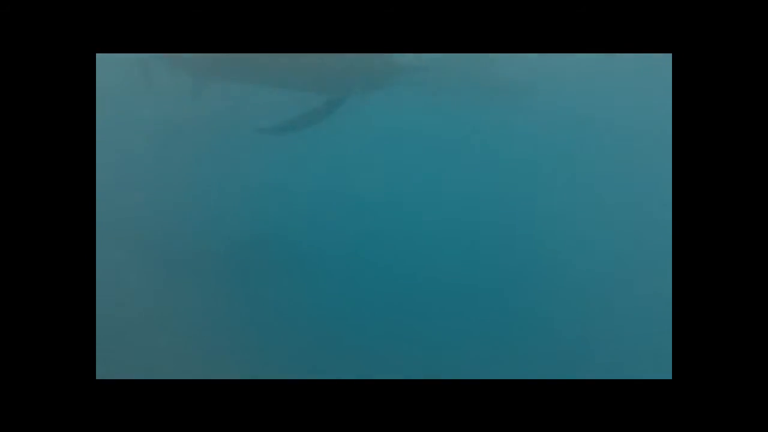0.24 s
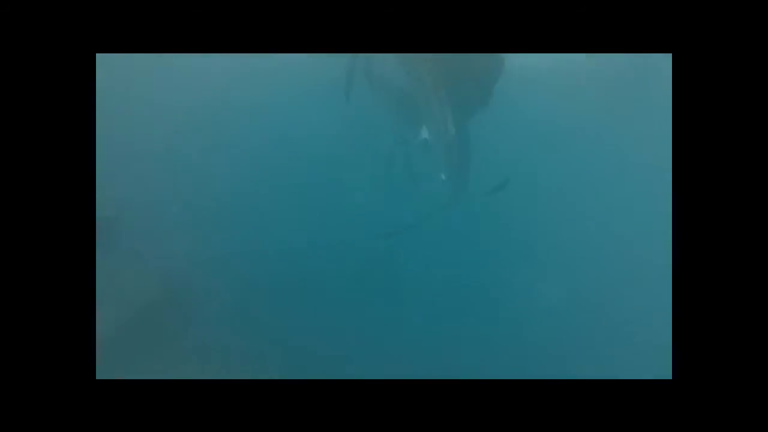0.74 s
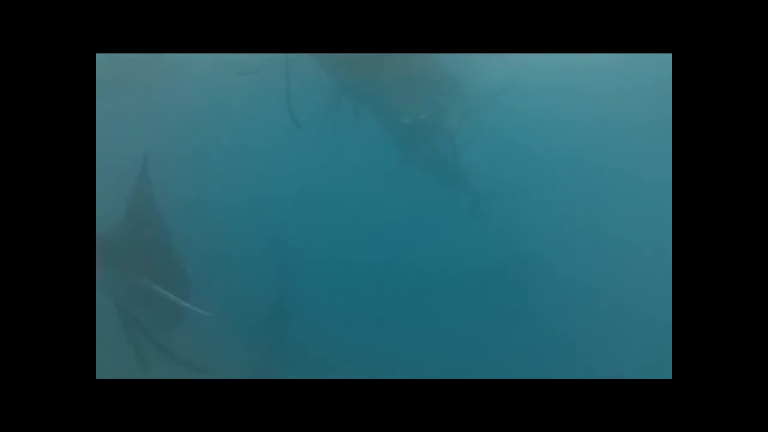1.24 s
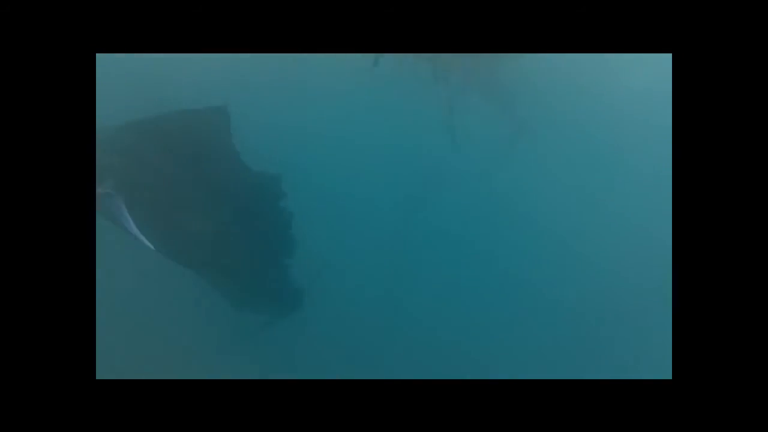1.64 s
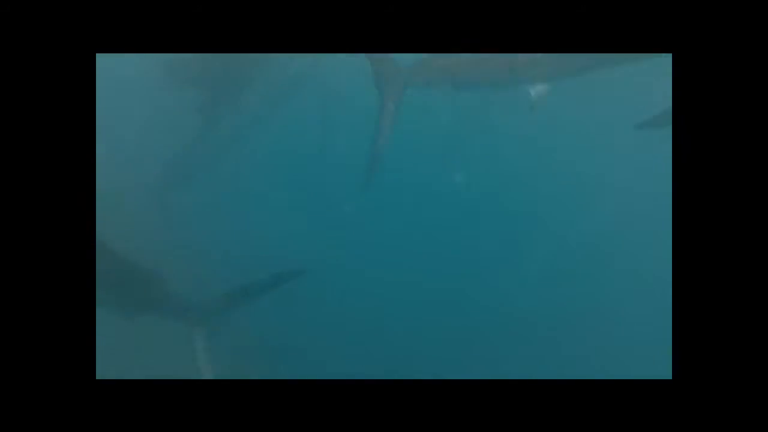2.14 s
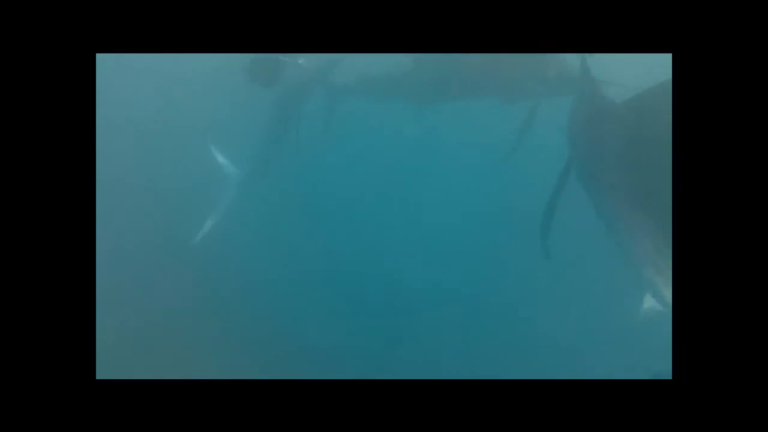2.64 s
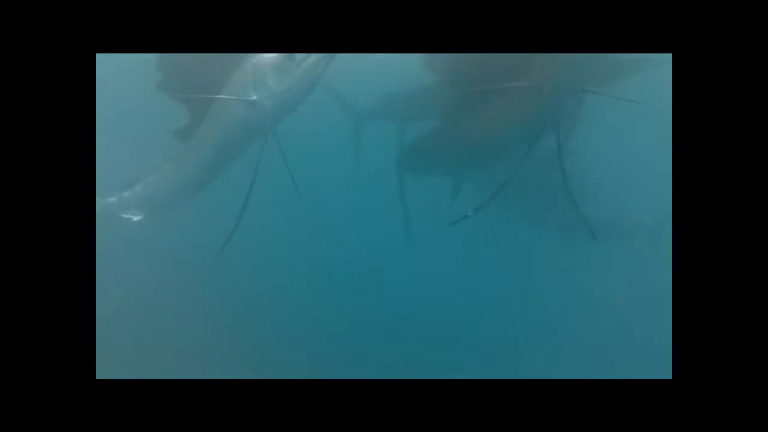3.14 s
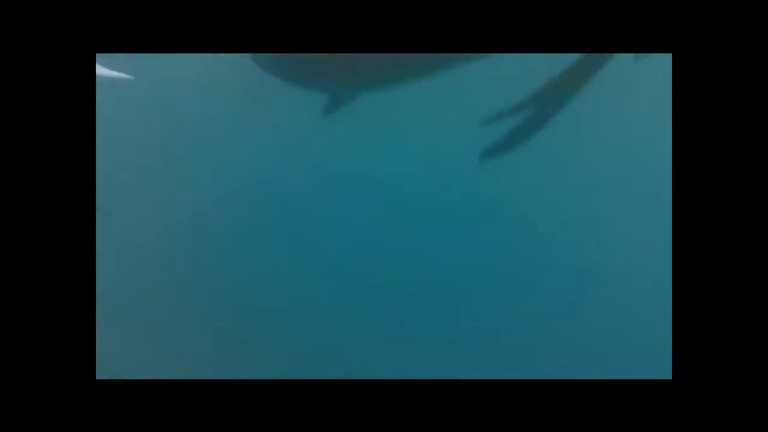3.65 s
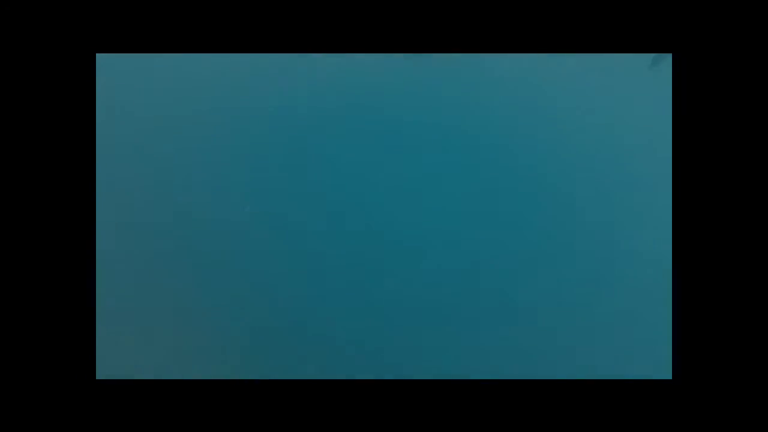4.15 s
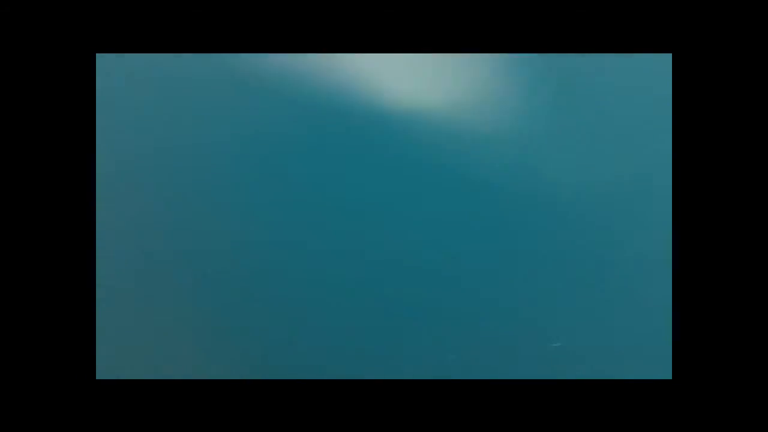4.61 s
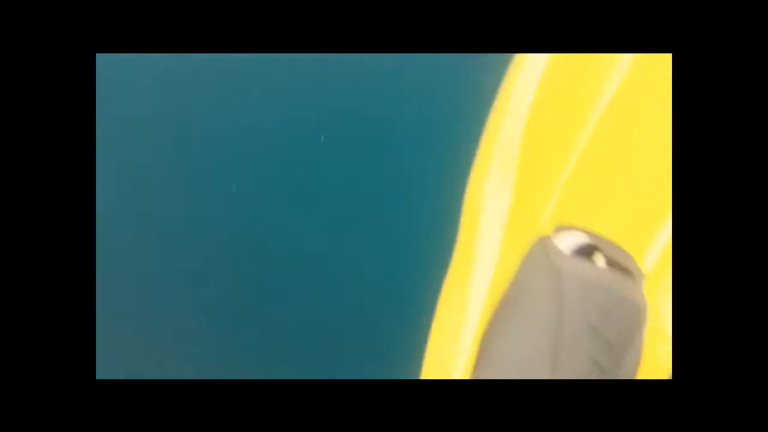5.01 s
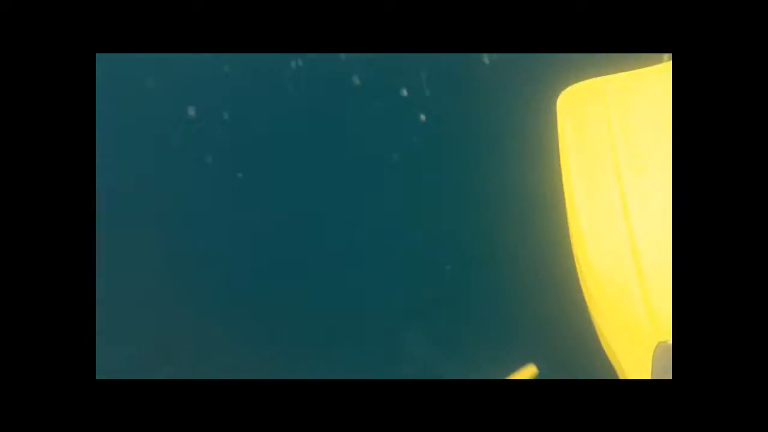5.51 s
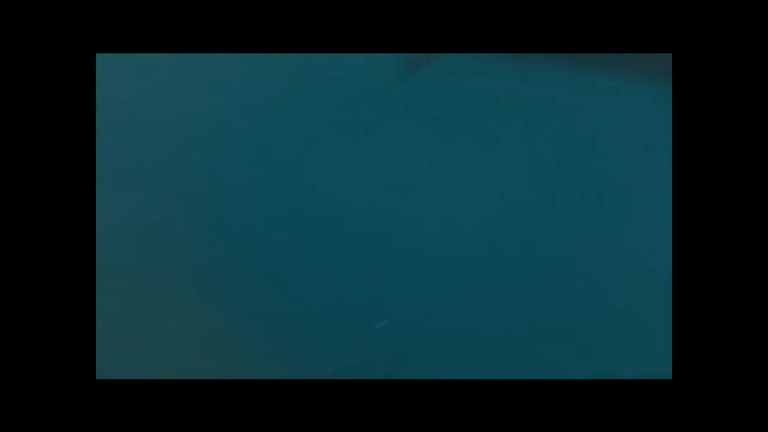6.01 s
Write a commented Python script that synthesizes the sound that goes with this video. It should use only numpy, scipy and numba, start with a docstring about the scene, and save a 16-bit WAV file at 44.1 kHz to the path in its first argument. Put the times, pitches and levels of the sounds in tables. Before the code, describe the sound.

Just below the sea surface, a sealed camera is swum among large fish. Deep wavering slosh and soft pressure thumps run throughout, with small bubbles ringing hollowly in the case. Thuds and glugs grow around 3.7 seconds, a rough cluster of hard knocks and gurgles hits at about 4.4 to 5, then it calms before another surge near 6. Very close, muffled sound with faint treble buzz.

```python
"""Just under the sea surface, a small camera in a sealed housing is swum along.
Water sloshes (a wandering slow swing), buffets (low noise), gurgles (bubble swarms) and surges
(pressure bumps) against the case; the air inside rings near 430 Hz (band-passed bubble knocks).
The loud pressure swings keep the stepped gain control of the recorder busy, so that its steps
buzz and tick faintly in the treble."""
import sys
import numpy as np
from scipy import signal
from scipy.io import wavfile
from scipy.ndimage import uniform_filter1d
from numba import njit

SR = 44100
rng = np.random.default_rng(int(sys.argv[2]) if len(sys.argv) > 2 else 0)


def persist_wave(psi):
    """Save psi, clipped to +-1, as 16-bit WAV."""
    counts = np.round(np.clip(psi, -1, 1) * 32767).astype(np.int16)
    wavfile.write(sys.argv[1], SR, np.atleast_2d(counts).T)


N = 276504
T = np.arange(N) / SR
# Levels in the scene's tables apply before the overall water level and the recorder's gain;
# only slosh, buffeting, gurgle, surges and glug notes then pass the case wall.


def undb(db):
    """Amplitude factor of a level in dB."""
    return 10 ** (np.asarray(db) / 20)


def unit(x):
    """Scale to an RMS of 1."""
    return x / np.sqrt(np.mean(x ** 2))


def band(x, lo_hz, hi_hz, order=2):
    """Keep the band between two frequencies."""
    return signal.sosfilt(signal.butter(order, [lo_hz, hi_hz], "band", fs=SR, output="sos"), x)


def noise():
    """White noise with a spread of 1."""
    return rng.standard_normal(N)


def walk(rate):
    """Random levels held 1 / rate s and slewed twice; spread 1."""
    hold = int(SR / rate)
    levels = np.repeat(rng.standard_normal(N // hold + 1), hold)
    slewed = uniform_filter1d(uniform_filter1d(levels, hold), hold)
    return unit(slewed[:N])


@njit
def rings(start, hz, t60, glide, attack, size, count):
    """Swelling, then decaying sines whose pitch slides by the factor glide over their life."""
    out = np.zeros(count)
    for k in range(len(start)):
        life, phase = int(t60[k] * SR), 0.
        for i in range(min(life, count - start[k])):
            phase += 2 * np.pi * hz[k] * glide[k] ** (i / life) / SR
            swell = min(i / (attack[k] * SR), 1.)
            out[start[k] + i] += size[k] * swell * np.sin(phase) * 1000. ** (-i / life)
    return out


def single_rings(s, db, hz, t60, glide, attack):
    """Single rings at given moments; t60, glide and attack may be shared by all."""
    one = np.ones(len(s))
    start = (s * SR).astype(np.int64)
    return rings(start, hz, t60 * one, glide * one, attack * one, undb(db), N)


def bubbles(rate, lo_hz, hi_hz, cycles, spread_db):
    """A random swarm of bubble notes rising in pitch, a few much louder than the rest."""
    when, pitch, loud = rng.random((int(rate * N / SR), 3)).T
    start = (when * N).astype(np.int64)
    hz = lo_hz * (hi_hz / lo_hz) ** pitch
    size = undb(-spread_db * np.log(1 - loud))
    glide = np.full(len(hz), 1.25)
    return unit(rings(start, hz, cycles / hz, glide, .5 / hz, size, N))


def bursts(table, attack_s, release_s):
    """Power of each level column over time: every row swells, holds and dies away."""
    power = 0
    for start, length, *db in table:
        before = (start - T) / attack_s
        after = (T - start - length) / release_s
        below_db = 20 * np.maximum(np.maximum(before, after), 0)
        power = power + undb(2 * (np.array(db)[:, None] - below_db))
    return power


def with_calm(power, calm_db):
    """Amplitude of bursts over the steady level that remains between them."""
    return np.sqrt(power + undb(2 * calm_db))


ROCK_HZ, ROCK_WANDER = 14, .3  # middle rate of the rocking, and its wander on a log scale


def rocking():
    """A slow swing whose rate and size wander."""
    turns = np.cumsum(ROCK_HZ * np.exp(ROCK_WANDER * walk(14))) / SR
    return unit(undb(2.5 * walk(10)) * np.sin(2 * np.pi * turns))


# rocking of the case in the swell, before it is lowered around surges: (t/s, level/dB)
SLOSH_LEVEL = [(0, -31.5), (.6, -32), (.85, -36), (1.15, -32.5), (1.4, -30), (2.1, -30.5), (3.0, -31.5),
               (3.55, -30.5), (3.72, -29), (3.9, -29.5), (4.1, -27), (4.35, -30), (4.6, -20.5),
               (4.9, -23.5), (5.1, -30), (5.65, -26.5), (5.85, -26), (6.1, -25.5), (6.2, -35), (6.27, -48)]
RUMBLE_DB = -9  # eddies that go with the rocking, below its level
SURGE_DUCK = .7  # share by which the random rocking is lowered around each surge


def slosh(surge_nearness):
    """The case rocks in the swell among low eddies, both lowered around each surge."""
    rumble = undb(RUMBLE_DB) * unit(band(noise(), 13, 48))
    level = undb(np.interp(T, *np.transpose(SLOSH_LEVEL)))
    return (1 - SURGE_DUCK * surge_nearness) * level * (rocking() + rumble)


# resonances of the trapped air: (f/Hz, width/Hz, relative level/dB)
AIR_RESONANCES = [(386.8, 90, -2.5), (454.3, 57, 2.5), (726, 400, -30), (957, 250, -24.5),
                  (1500, 1100, -39)]


def cavity():
    """Small bubbles and fizz on the walls ring the trapped air; nothing much passes above it."""
    knocks = bubbles(260, 300, 900, 2.6, 2.1) + noise()
    air = 0
    for hz, width, db in AIR_RESONANCES:
        air = air + undb(db) * band(knocks, hz - width / 2, hz + width / 2, order=3)
    return undb(1.6 * walk(25)) * unit(air)


# short ringing accents, a few of them clear pops: (t/s, level/dB, starting f/Hz)
RING_ACCENTS = [(0.049, -28, 460), (0.113, -47, 450), (0.321, -32, 447), (0.412, -47, 453),
                (0.455, -41, 464), (0.627, -42, 355), (0.707, -40, 376), (0.799, -23.5, 392),
                (0.819, -23, 445), (1.007, -39, 350), (1.041, -32, 446), (1.283, -36, 439),
                (1.73, -37, 426), (1.825, -28, 434), (1.876, -20, 414), (1.944, -40.5, 427),
                (2.045, -33, 454), (2.288, -40, 450), (2.405, -41.5, 474), (2.462, -36, 436),
                (2.486, -27, 458), (2.88, -40, 345), (3.071, -43, 380), (5.651, -40, 450),
                (6.061, -37, 405)]


def ring_accents():
    """Very short decaying sines that fall in pitch."""
    return single_rings(*np.transpose(RING_ACCENTS), t60=.012, glide=.72, attack=.00083)


# short bright chirps and ticks; the one at 6.043 s is a gain-step tick: (t/s, level/dB, starting f/Hz)
BRIGHT_CHIRPS = [(4.791, -49.5, 1720), (4.559, -40, 750), (4.797, -38, 778), (4.799, -43.5, 1290),
                 (4.8, -55, 3630), (4.8025, -45, 2110), (4.807, -42.5, 1650), (4.812, -46, 1580),
                 (4.817, -54.5, 3230), (4.825, -54, 2460), (4.816, -35.5, 1540), (4.825, -42.5, 1860),
                 (4.832, -51, 1324), (4.84, -48.5, 1325), (4.8484, -52.5, 1284), (4.862, -48, 1500),
                 (4.875, -53, 1900), (6.043, -50, 1900)]


def chirps():
    """Brief decaying sines that rise a little in pitch."""
    return single_rings(*np.transpose(BRIGHT_CHIRPS), t60=.015, glide=1.1, attack=.00058)


def buffeting():
    """Turbulent water on the case: low noise of flickering size."""
    return undb(3.5 * walk(18)) * unit(band(noise(), 25, 125))


# turbulent water buffeting the case: (t/s, length/s, buffeting level/dB, gurgle level/dB)
BUFFET_BURSTS = [(.1, 0.14, -41, -35.5), (1.04, 0.043, -32, -56), (1.34, 0.15, -32, -48.5),
                 (1.7, 0.31, -43, -62), (2.45, 0.058, -39.5, -54.5), (2.58, 0.056, -29, -54),
                 (2.85, 0.043, -64, -53), (3.46, 0.17, -36.5, -69), (3.73, 0.064, -30, -54.5),
                 (3.84, 0.1, -39.5, -35.5), (4.43, 0.084, -24, -31), (4.53, 0.061, -29, -29),
                 (4.64, 0.029, -23.5, -24), (4.79, 0.12, -26, -48.5), (4.98, 0.043, -28, -41),
                 (5.4, 0.058, -40.5, -62), (5.81, 0.19, -31.5, -40), (5.92, 0.27, -26, -33.5)]


def buffet_powers():
    """Powers of the buffeting and of the gurgle that goes with it; attack and release span 20 dB."""
    return bursts(BUFFET_BURSTS, attack_s=.037, release_s=.071)


# streams of small bubbles over the case: (t/s, length/s, cavity ring level/dB, gurgle level/dB)
BUBBLE_STREAMS = [(0.0, 0.35, -32, -35.5), (.41, 0.25, -32.5, -37.5), (.68, 0.3, -30, -32),
                  (1.02, 0.093, -27, -29.5), (1.16, 0.12, -34, -35), (1.27, 0.15, -39, -47),
                  (1.46, 0.016, -43.5, -51), (1.57, 0.052, -45, -51), (1.66, 0.036, -36.5, -40),
                  (1.73, 0.18, -26, -34), (1.88, 0.23, -28.5, -38), (2.17, 0.072, -36, -45.5),
                  (2.29, 0.059, -39.5, -46), (2.38, 0.024, -33, -43.5), (2.42, 0.099, -28, -37),
                  (2.73, 0.058, -34.5, -43.5), (2.84, 0.12, -43.5, -48.5), (3.05, 0.13, -37, -51),
                  (3.3, 0.072, -46, -70), (3.77, 0.013, -43, -48), (3.86, 0.093, -51.5, -40),
                  (4.04, 0.11, -42.5, -54), (4.2, 0.049, -47.5, -63), (4.45, 0.045, -40, -23.5),
                  (4.655, 0.0077, -39, -26.5), (4.74, 0.0099, -34, -32), (4.862, .02, -35.5, -20.5),
                  (5.14, 0.073, -55, -64), (5.3, 0.038, -48, -52), (5.43, 0.036, -45, -67),
                  (5.6, 0.072, -45.5, -46.5), (5.84, 0.054, -56, -35.5), (5.91, 0.06, -36.5, -20.5),
                  (6.02, 0.094, -39.5, -27), (6.17, 0.081, -50, -41.5)]


def stream_powers():
    """Powers of the cavity ring and gurgle of the streams; attack and release span 20 dB."""
    return bursts(BUBBLE_STREAMS, attack_s=.038, release_s=.041)


def gurgle():
    """A swarm of bubble notes mixed with noise, flickering in size."""
    water = bubbles(120, 140, 380, 3.8, 2.5) + .79 * noise()
    return undb(2.2 * walk(12)) * unit(band(water, 125, 370))


# big bubbles breaking beside the case: (t/s, level/dB, starting f/Hz, t60/s, glide factor, attack/s)
BIG_BUBBLES = [(1.675, -26, 413, 0.059, 0.86, 0.0033), (3.126, -28, 432, 0.17, 1.03, 0.0059),
               (3.685, -18, 477, 0.12, 0.45, 0.015), (3.705, -24.5, 373.6, 0.37, 1.44, .016),
               (3.81, -29.5, 409, 0.18, 1.12, .012), (3.903, -22.5, 298, 0.086, 0.56, 0.0063),
               (4.401, -11.5, 319.5, 0.035, 0.64, 0.0022), (4.471, -9, 246, 0.088, 1.02, 0.0032),
               (4.736, -11.5, 451, 0.057, 1.2, 0.0053), (4.863, -9, 252.3, 0.097, 1, 0.0035),
               (5.002, -17.5, 249, 0.037, 1.4, 0.0026), (6.04, -17.5, 269, 0.045, 0.49, 0.0037),
               (6.127, -30, 255, 0.065, 0.35, 0.0017)]
GLUG_OVERTONE_DB = -27.5  # octave above, below the level of its note


def glugs():
    """Big bubbles, and apart from them the faint octave of each, which dies first."""
    s, db, hz, t60, glide, attack = np.transpose(BIG_BUBBLES)
    notes = single_rings(s, db, hz, t60, glide, attack)
    octaves = single_rings(s, db + GLUG_OVERTONE_DB, 2 * hz, .5 * t60, glide ** .5, attack)
    return notes, octaves


# pressure surges on the case: (t/s of the peak, push 1 or pull -1, level/dB, half fall/ms)
PRESSURE_SURGES = [(0.023, -1, -20, 7.6), (0.118, 1, -24, 23), (0.168, -1, -21.5, 2.6),
                   (0.211, 1, -18.5, 9.9), (0.26, -1, -20, 12.4), (0.294, 1, -22, 12),
                   (0.33, -1, -22.5, 18.3), (0.368, 1, -17.5, 20), (0.429, -1, -26.5, 9.8),
                   (0.463, 1, -26.5, 9.8), (0.5, -1, -21.5, 23), (0.554, 1, -22.5, 11),
                   (0.585, -1, -21.5, 19), (0.624, 1, -24, 21), (0.715, 1, -23.5, 11),
                   (0.859, 1, -20, 20.6), (.66, -1, -22, 15), (0.979, -1, -16.5, 7.3), (1.115, -1, -23, 19),
                   (1.154, 1, -23, 20), (1.206, -1, -23.5, 11.5), (1.24, 1, -21, 25), (1.276, -1, -21, 8),
                   (1.294, 1, -16.5, 8.2), (1.309, -1, -21, 5), (1.326, 1, -23.5, 5.5),
                   (1.368, 1, -13, 3.3), (1.388, 1, -18.5, 3.7), (1.432, -1, -15.5, 7.5),
                   (1.464, -1, -21, 8), (1.492, 1, -19.5, 6.8), (1.526, -1, -11, 3.2),
                   (1.577, 1, -21.5, 21.3), (1.612, -1, -17, 21.5), (1.656, 1, -24, 12), (1.75, 1, -23, 10),
                   (1.778, -1, -14.5, 10.4), (1.81, 1, -25, 14), (1.941, -1, -26, 14), (1.982, 1, -23, 18),
                   (2.063, -1, -24.5, 7.6), (2.098, 1, -15, 20.5), (2.157, -1, -19, 18.7),
                   (2.2, 1, -23, 10.4), (2.232, -1, -18, 20.5), (2.291, 1, -19.5, 20),
                   (2.346, -1, -21.5, 26), (2.534, 1, -15.5, 14), (2.585, -1, -20.5, 5.8),
                   (2.604, -1, -14, 2.7), (2.635, -1, -19.5, 9.9), (2.676, 1, -17.5, 6.3),
                   (2.716, 1, -20, 11.3), (2.77, 1, -17, 36.7), (2.828, -1, -15, 16.8),
                   (2.883, -1, -17, 10.4), (2.941, 1, -17, 42), (3.013, -1, -18.5, 16.4),
                   (3.043, 1, -20, 16), (3.079, -1, -20.5, 16.4), (3.156, 1, -20, 10.5),
                   (3.186, -1, -17.5, 16.6), (3.237, 1, -16.5, 7.7), (3.228, 1, -20.5, 7.2),
                   (3.262, -1, -15, 23), (3.315, 1, -18.5, 14), (3.391, 1, -21, 12), (3.433, -1, -16, 6.9),
                   (3.496, 1, -20, 10.6), (3.526, -1, -13, 2.25), (3.627, 1, -16, 25),
                   (3.669, -1, -15.5, 24.5), (3.757, 1, -9.5, 2.9), (3.767, 1, -12.5, 8.7),
                   (3.788, -1, -7, 13), (3.821, 1, -24.5, 20), (3.894, 1, -6.5, 1.8),
                   (3.942, -1, -8.5, 4.6), (3.984, 1, -20, 18), (4.039, 1, -20, 13.4),
                   (4.145, -1, -17, 25.5), (4.201, 1, -20, 19.3), (4.251, -1, -16.5, 19),
                   (4.302, 1, -30, 6.1), (4.334, -1, -19.5, 16.5), (4.386, 1, -18, 4.9),
                   (4.44, 1, -14.5, 0.98), (4.463, 1, -9, 1.14), (4.471, 1, -2.5, 0.62),
                   (4.475, -1, -9.5, 0.92), (4.493, -1, -11, 1.4), (4.506, 1, -6.5, 1.76),
                   (4.526, 1, -7, 2.5), (4.536, 1, -11.5, 1.3), (4.548, -1, -9, 5.8), (4.558, 1, -5.5, 4.2),
                   (4.573, -1, -11, 3.7), (4.581, 1, -12.5, 2.8), (4.591, -1, -11.5, 18.4),
                   (4.64, 1, -11, 8.3), (4.655, -1, -2.5, 2.16), (4.664, 1, -9, 0.96), (4.673, 1, -10, 2.6),
                   (4.69, -1, -8, 4.5), (4.727, 1, -12.5, 4.9), (4.734, -1, -5, 1.38),
                   (4.763, -1, -11, 3.5), (4.808, 1, -16, 4.6), (4.83, -1, -14.5, 2.5),
                   (4.848, -1, -12.5, 4), (4.86, 1, -8, 4), (4.876, -1, -4, 1.14), (4.916, 1, -19, 7.4),
                   (4.947, 1, -17, 14), (5, -1, -11.5, 4.8), (5.026, 1, -18, 6.8), (5.084, 1, -14.5, 12.8),
                   (5.129, -1, -19.5, 10.5), (5.153, 1, -15.5, 18), (5.198, -1, -15.5, 21),
                   (5.313, 1, -18.5, 25.2), (5.365, -1, -17, 17), (5.395, -1, -20.5, 6),
                   (5.439, 1, -17, 32.6), (5.517, -1, -21, 23), (5.576, 1, -20, 10.8),
                   (5.614, -1, -19, 9.4), (5.659, 1, -17, 43.5), (5.708, -1, -21.5, 9),
                   (5.725, 1, -18, 3.3), (5.737, -1, -16.5, 5.5), (5.752, 1, -16.5, 8.2),
                   (5.77, -1, -12.5, 21), (5.826, 1, -14, 10.4), (5.869, -1, -13.5, 5.2),
                   (5.888, 1, -8.5, 15.6), (5.921, -1, -9.5, 2.2), (5.931, -1, -12, 8.7),
                   (5.962, 1, -18.5, 8), (5.993, -1, -18.5, 8), (6.043, 1, -8.5, 0.7),
                   (6.064, 1, -11.5, 1.28), (6.086, -1, -14.5, 1.7), (6.135, 1, -13, 2),
                   (6.204, -1, -17, 12.3), (6.242, 1, -17, 1.5)]
RISE_MS, RISE_POWER = 1.5, .52  # half rise = RISE_MS * (half fall in ms) ** RISE_POWER


def surges():
    """Smooth bumps of pressure (slow ones rise faster than they fall), and the nearness of a surge, 0 to 1."""
    out, nearness = np.zeros(N), np.zeros(N)
    for s, way, db, fall_ms in PRESSURE_SURGES:
        near = slice(max(int((s - .1) * SR), 0), int((s + .15) * SR))
        ms = (T[near] - s) * 1000
        half_ms = np.where(ms < 0, RISE_MS * fall_ms ** RISE_POWER, fall_ms)
        out[near] += np.sign(way) * undb(db) * .5 ** ((ms / half_ms) ** 2)
        # the nearness is wider than the bump on both sides
        nearness[near] = np.maximum(nearness[near], .5 ** ((ms / (half_ms + 15)) ** 2))
    return out, nearness


def case_wall(flow):
    """The wall passes little of the flow above 565 Hz."""
    return signal.sosfilt(signal.butter(3, 565, fs=SR, output="sos"), flow)


# overall level of the water sounds, lower in the calmer stretches: (t/s, level/dB)
WATER_LEVEL = [(0, -3), (1.3, -3), (2.6, -3), (3.6, -3), (3.67, 0), (3.96, 0), (4.05, -2), (4.4, -2),
               (4.46, 0), (4.97, 0), (5.05, -2), (5.74, -2), (5.78, 0), (6.17, 0), (6.2, -2)]


def water_level():
    """Overall level of the water sounds over time, as an amplitude factor."""
    return undb(np.interp(T, *np.transpose(WATER_LEVEL)))


CALM_RING_DB, CALM_BUFFET_DB, CALM_GURGLE_DB = -53, -54, -55.5  # between streams and buffets
SPRAY_DB = -39  # thin upper edge of the gurgle, below its level


def scene():
    """Flow through the case wall, then the brighter rings and spray, all under one water level."""
    ring_power, stream_gurgle = stream_powers()
    buffet_power, buffet_gurgle = buffet_powers()
    gurgle_level = with_calm(stream_gurgle + buffet_gurgle, CALM_GURGLE_DB)
    blows, surge_nearness = surges()
    notes, octaves = glugs()

    flow = slosh(surge_nearness)
    flow = flow + with_calm(buffet_power, CALM_BUFFET_DB) * buffeting()
    flow = flow + gurgle_level * gurgle()
    flow = case_wall(flow + blows + notes)
    spray = gurgle_level * undb(SPRAY_DB) * unit(band(noise(), 560, 1100, order=4))
    ring = with_calm(ring_power, CALM_RING_DB) * cavity()
    return (water_level() * (flow + spray + octaves + ring + chirps() + ring_accents()))[None]


HIGH_DB, LOW_DB, RANGE_DB = -16, -21.5, 13.5  # step down above, step up below, most gain
METER_WOBBLE_DB = 1.5  # the threshold for the down steps is unsteady, which scatters them
RISE_S, FALL_S = .012, .03  # sluggish meter for the up steps
QUICK_FALL_S = .016  # peak meter for the down steps
DOWN_HZ, UP_HZ = 2400, 300  # how often a step down or up may be taken
STEP_DB, KICK_DB, KICK_S = .16, .4882, 1 / 2700  # a gain step; its overshoot and length before shaping
UP_SHARE = .9  # a step up overshoots less than a step down


@njit
def gain_steps(x, high, low, rise, fall, quick_fall, step, most, down, up):
    """Gain in dB: meters on the output step it down fast on peaks and up slowly when quiet."""
    out, db, mean, quick, wait_down, wait_up = np.empty(len(x)), most / 2, 0., 0., 0., 0.
    for i in range(len(x)):
        now = abs(x[i]) * 10 ** (db / 20)
        mean = now + (mean - now) * (rise if now > mean else fall)
        quick = max(now, quick * quick_fall)
        wait_down += 1
        wait_up += 1
        if wait_down >= down:
            wait_down -= down
            if quick > high[i]:
                db = max(db - step, 0.)
        if wait_up >= up:
            wait_up -= up
            if mean < low:
                db = min(db + step, most)
        out[i] = db
    return out


def step_overshoot(db):
    """Brief kick in dB after each gain step, heard as buzz and ticks."""
    kick = KICK_DB / STEP_DB * (db - np.interp(T - KICK_S, T, db))
    kick = np.where(kick > 0, UP_SHARE, 1) * kick
    kick = np.convolve(kick, [.34, .29, .17, .14, .076])[:N]  # edges spread over five samples
    return signal.lfilter(*signal.iirnotch(7200, 3, SR), kick)  # little of it near 7 kHz


def record(dry):
    """Stepped gain whose steps overshoot briefly, coupling high-pass, faint hiss, clipping, cut top."""
    high = undb(HIGH_DB + METER_WOBBLE_DB * walk(2000))
    keeps = np.exp(-1 / (np.array([RISE_S, FALL_S, QUICK_FALL_S]) * SR))
    db = gain_steps(dry[0], high, undb(LOW_DB), *keeps, STEP_DB, RANGE_DB, SR / DOWN_HZ, SR / UP_HZ)
    lag = int(KICK_S * SR)
    ramped_db = uniform_filter1d(db, size=lag, origin=(lag - 1) // 2)  # each step ramps in after its start
    gain = undb(ramped_db + step_overshoot(db))

    x = signal.sosfilt(signal.butter(1, 4.2, "high", fs=SR, output="sos"), dry[0] * gain)
    x = x + undb(-86.5) * unit(band(noise(), 500, 4700, order=4))  # faint hiss of the recorder
    ceiling = .5
    x = x / (1 + (x / ceiling) ** 40) ** (1 / 40)  # clips with a slightly rounded knee
    return signal.sosfilt(signal.ellip(8, .2, 70, 15800, fs=SR, output="sos"), x)[None]


dry = scene()
out = record(dry)
persist_wave(out)
```